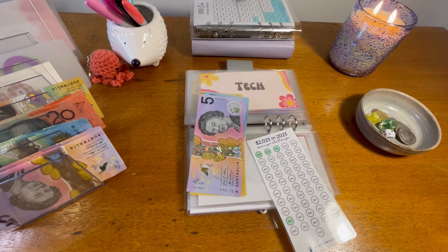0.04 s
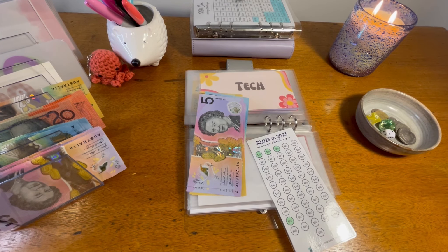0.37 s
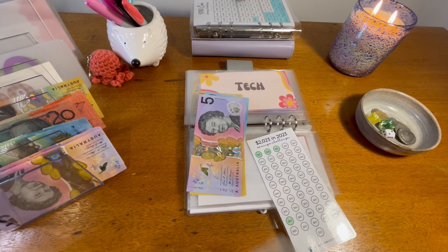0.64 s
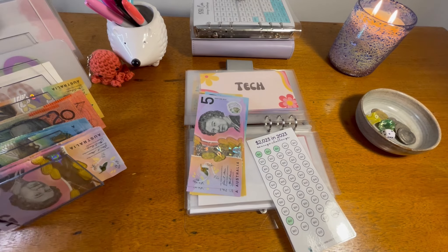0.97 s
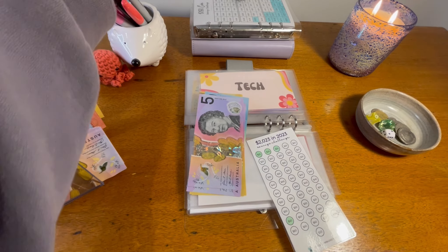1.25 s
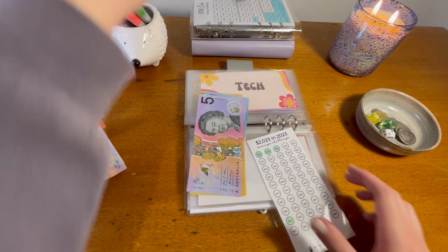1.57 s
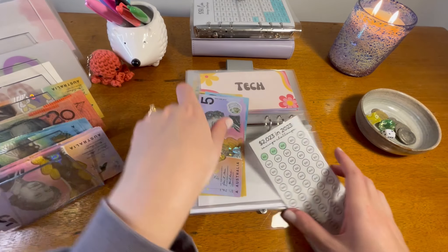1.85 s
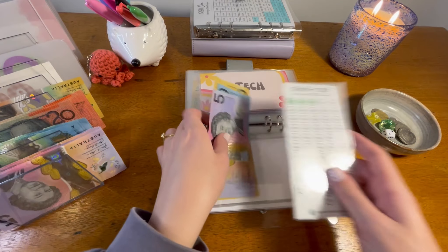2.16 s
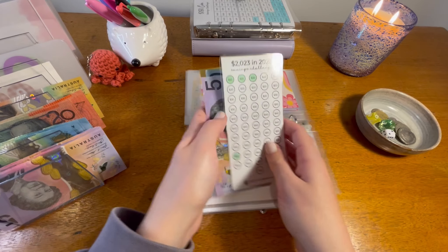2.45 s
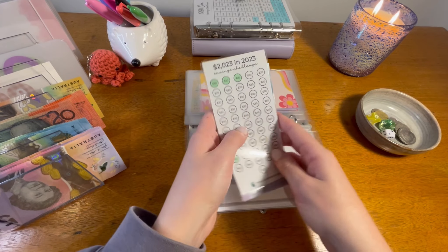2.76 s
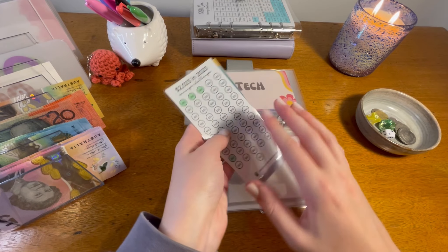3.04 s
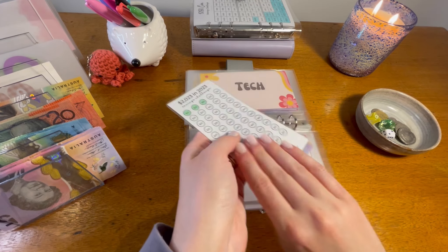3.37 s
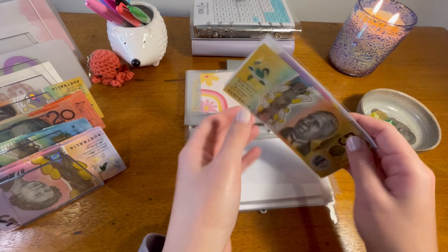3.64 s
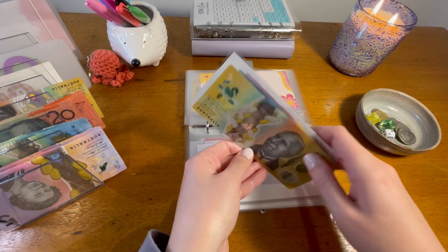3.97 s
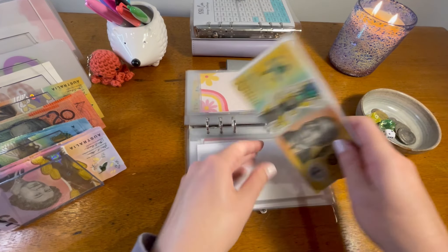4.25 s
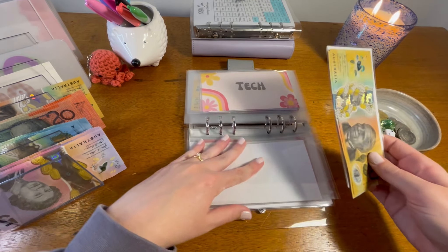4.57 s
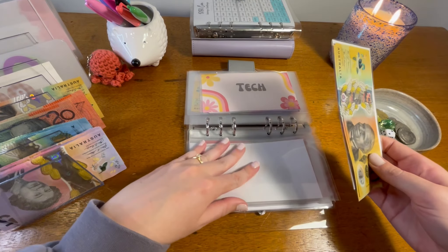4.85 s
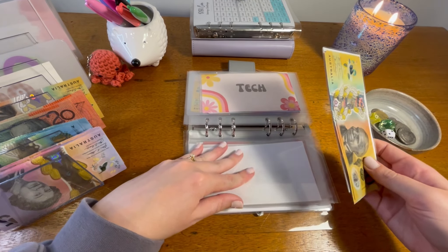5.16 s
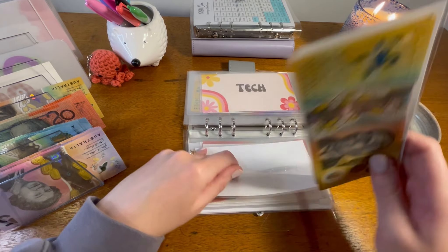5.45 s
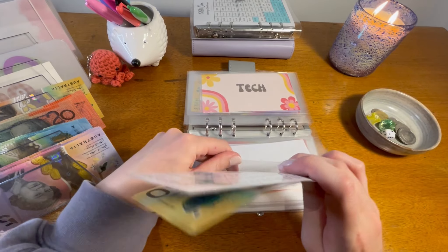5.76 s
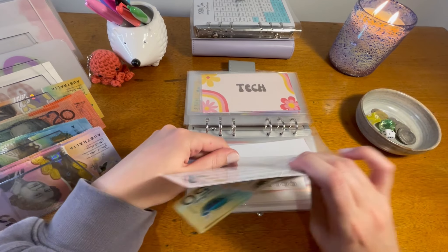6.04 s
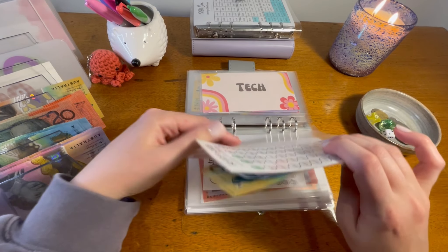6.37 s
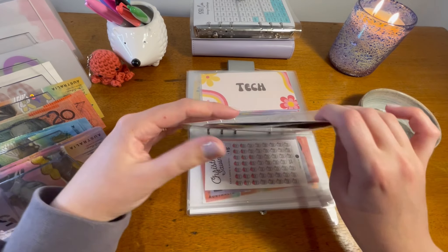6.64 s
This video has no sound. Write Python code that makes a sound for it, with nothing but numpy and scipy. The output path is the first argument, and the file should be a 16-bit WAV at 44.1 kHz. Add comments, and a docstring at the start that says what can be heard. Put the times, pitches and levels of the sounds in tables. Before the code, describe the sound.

A wooden desk thumps and creaks briefly at about 0.2 seconds, followed by a few soft bumps and small crisp snaps. From 1.2 to 1.8 seconds a chair clunks repeatedly and rolls with a low rumble, its spring twanging. Around 2 seconds a card and banknotes tap and slap down, with hollow pats that make the desk top boom softly. They slide together in short hissing strokes until 3 seconds, then more sparsely. A sharp snap comes at 4.3 seconds, followed by light pats and ticks, and a steel binder ring pings faintly near 4.9. More snaps and a brief rustle follow between 5.1 and 5.4. From 6 seconds to about 6.8, stiff plastic sleeves are turned, rubbing and crackling, loudest near 6.4, where they land with hollow pats. Everything sounds close in a small room, over a faint rumble and hiss.

```python
"""A wooden desk thumps and creaks as someone leans on it; then a chair clunks and rolls closer, twanging.
A card and banknotes are slid together and flicked, and a binder's plastic sleeves are turned: stiff
sheets snap as they buckle, hiss as they rub and land with hollow pats that set the desk top booming.
A binder ring pings once. It all plays in a small room, over a faint rumble and hiss."""
import sys
import numpy as np
from scipy import signal
from scipy.fft import rfft, irfft, next_fast_len
from scipy.io import wavfile
from scipy.ndimage import uniform_filter1d, map_coordinates

SR = 44100
rng = np.random.default_rng(int(sys.argv[2]) if len(sys.argv) > 2 else 0)


def wav_record(signal):
    """Record a signal, one row per channel, as 16-bit PCM in the file named by sys.argv[1]."""
    frames = np.transpose(np.atleast_2d(signal))
    bounded = np.clip(frames, -1, 1)
    # unit amplitude maps onto the largest positive 16-bit level
    quanta = np.round(bounded * 32767).astype(np.int16)
    wavfile.write(sys.argv[1], SR, quanta)


N = 299858
TIME = np.arange(N) / SR
HIT_TIME = np.arange(SR // 2) / SR  # the half second given to each one-shot
SIDES = np.array([[.5], [-.5]])  # splits a difference between left and right
TOP_HZ = 15900

# a stiff sheet buckling: t/s, level/dB, centre f/Hz
BUCKLES = [(0.324,-44.5,13000), (0.806,-35,5370), (0.806,-36,8270), (0.979,-37.5,4470), (1.52,-40,9000),
           (4.3134,-31,8360), (4.3163,-29.5,7300), (4.3157,-38,3350), (4.3206,-50,2030), (4.927,-45.5,9900),
           (5.1122,-32,11300), (5.3027,-43,4700), (5.3341,-35,3730), (6.374,-31,5430)]
# a card's edge tapping the stack: t/s, level/dB
CARD_TAPS = [(1.7703,-44), (1.779,-39.5), (1.8027,-45), (1.9745,-29.5), (2.027,-28), (2.16,-34.5),
             (2.327,-42.5), (2.344,-51), (2.393,-45), (2.507,-44.5), (2.68,-48), (2.695,-48.5),
             (2.892,-44.5), (3.5,-46.5), (6.739,-44)]
# the card's hollow resonances: f/Hz
CARD_MODES = [1070, 1350, 1622, 2054]
# a sheet slapping down flat: t/s, level/dB
SHEET_SLAPS = [(1.882,-31.5), (2.028,-31), (2.147,-37.5), (4.133,-46), (4.4502,-37.5), (4.466,-38.5),
               (6.379,-35.5), (6.546,-41)]
# a crease giving way: t/s, level/dB
CREASE_TICKS = [(2.341,-40.5), (2.504,-35.5), (2.548,-43), (3.553,-45), (4.515,-42.5), (4.561,-45),
                (5.321,-40), (5.7698,-40), (6.25,-50), (6.304,-51), (6.412,-33)]
# the crack of a stiff sheet: f/Hz, level/dB
SHEET_EQ = [(150, -42), (500, 2), (820, 6), (1300, 6), (2000, 6), (3200, 2.5), (7500, 4), (12000, -6.5),
            (15500, -17.5)]
# strokes of sheet on sheet: t/s, swell/s, time to release/s, level/dB
SLIDE_STROKES = [(0,0.0022,0.11,-62), (0.509,0.042,0.15,-70.5), (1.99,0.024,0.045,-52),
                 (2.278,0.033,0.075,-54.5), (2.38,0.023,0.084,-58), (2.495,0.0076,0.08,-52.5),
                 (2.623,0.019,0.065,-58.5), (2.861,0.017,0.068,-54.5), (3.381,0.019,0.074,-60.5),
                 (3.491,0.0088,0.062,-58.5), (3.878,0.011,0.02,-52.5), (3.941,0.015,0.057,-58),
                 (4.577,0.037,0.11,-59), (5.295,0.013,0.04,-56.5), (5.673,0.01,0.13,-65.5),
                 (5.996,0.025,0.068,-55.5), (6.066,0.079,0.083,-50), (6.357,0.022,0.02,-42.5),
                 (6.417,0.028,0.031,-46.5)]
# sheets shifting in the hands: t/s, hiss level/dB, flex level/dB
HANDLING_FADERS = [(1.72, -58, -57), (2.34, -56.5, -54.5), (2.55, -64.5, -59.5), (2.72, -58.5, -75),
                   (3.05, -85, -83), (3.37, -86, -88), (3.52, -61, -64), (3.85, -114, -91),
                   (4.09, -67.5, -89), (4.25, -69, -74.5), (4.55, -65, -59), (4.68, -78, -71),
                   (5.0, -103, -68.5), (5.28, -95, -89.5), (5.36, -51, -58.5), (5.56, -81, -101.5),
                   (5.93, -93, -98), (6.0, -55.5, -61.5), (6.2, -58.5, -61), (6.8, -61.5, -59)]
# sheets sliding: f/Hz, level/dB
SLIDE_EQ = [(880, -16), (1500, -15), (1850, -19), (2040, -9), (3570, -11.5), (4630, -10), (11300, -10.5),
            (15000, -24.5)]
# sheets flexing: f/Hz, level/dB
FLEX_EQ = [(60, 5.5), (130, 12.5), (400, -1.5), (640, 3), (900, -3.5), (1300, -1), (2200, -1),
           (3400, -38.5)]
# hands and sleeves landing: t/s, pat level/dB, pat f/Hz, desk boom level/dB
TOUCHDOWNS = [(0.175,-44.5,410,-39), (0.237,-37.5,214,-26.5), (0.318,-56,236,-44), (0.544,-47.5,328,-43.5),
              (0.57,-47,297,-40), (1.883,-47,726,-44.5), (1.972,-42.5,650,-50), (2.027,-39,370,-44),
              (2.148,-34,418,-41), (2.16,-31.5,344,-34), (2.331,-50,340,-44.5), (2.694,-52,380,-51),
              (2.902,-82,250,-55), (3.499,-42,634,-45), (3.824,-74,231,-48.5), (4.133,-54.5,246,-50.5),
              (4.204,-46,213,-48), (4.392,-52.5,466,-55.5), (4.451,-37.5,495,-75), (4.859,-48,415,-58.5),
              (5.112,-48,375,-48.5), (5.35,-44.5,636,-51), (6.376,-32.5,612,-44.5), (6.451,-39,262,-44.5),
              (6.463,-43.5,610,-67), (6.548,-42,570,-62)]
# the desk top's modes: f/Hz, level/dB, t60/s
DESK_MODES = [(95.3, -7.5, 0.17), (134, -3.5, 0.24), (212.4, 6, 0.13), (259.7, -3.5, 0.15),
              (325, -10.5, 0.15)]
# slips of one desk joint as weight comes on: t/s
CREAK_SLIPS = [0.2225, 0.236, 0.2445, 0.264]
# the wood of that joint: f/Hz, level/dB
WOOD_EQ = [(500, -14), (860, 14), (1300, -0.5), (2100, 6.5), (2600, -2), (3800, 0.5), (5200, -5),
           (11000, -9), (15000, -34)]
# chair joints giving way: t/s, frame level/dB, crack over frame/dB, spring over frame/dB
CHAIR_CLUNKS = [(1.1663, -32.5, 11.5, -9.5), (1.259, -37.5, 3.5, 2.5), (1.321, -32.5, 2, -10),
                (1.378, -35.5, -7, -11.5), (1.412, -30, -29, -20), (1.497, -30.5, -22.5, -22),
                (1.571, -27.5, -6.5, -12), (1.612, -30, 1, -7), (1.622, -30.5, -2.5, 2)]
# the crack of a chair joint: f/Hz, level/dB
CRACK_EQ = [(590, -8), (1000, -12.5), (1900, -18), (3200, -12), (3900, -6), (6700, -7.5), (8500, -13),
            (10500, -16.5), (12200, -10.5), (15500, -26)]
# the chair frame's modes: f/Hz, level/dB, t60/s
FRAME_MODES = [(135.7, 1.5, 0.4), (186, 3, 0.12), (258.8, 1.5, 0.24), (342.7, 2, 0.12), (448, 0.5, 0.059),
               (608, 5.5, 0.047), (748, -0.5, 0.084), (784, 6.5, 0.039)]
# the rattling spring's modes: f/Hz, level/dB, t60/s
SPRING_MODES = [(2273, 9, 0.015), (2370, -1, 0.033)]
# the chair rolling over the floor: t/s, level/dB
ROLL_FADER = [(1.18, -53.5), (1.3, -51), (1.41, -52.5), (1.465, -54.5), (1.64, -44), (1.72, -55),
              (1.85, -64)]
# the rumble of that roll: f/Hz, level/dB
ROLL_EQ = [(60, -2), (130, -4), (270, -7), (420, -8), (750, -11), (1100, -20.5), (2000, -30)]
# the spring ringing free: t/s, level/dB, f/Hz
SPRING_TWANGS = [(1.271, -55, 2370), (1.617, -40, 2273)]
# a steel binder ring's modes: f/Hz, level/dB, t60/s
STEEL_MODES = [(8740, 4, 0.12), (8500, -1, 0.1)]
# room tone: f/Hz, level/dB
ROOM_TONE_EQ = [(28, -16), (46, 8), (90, -5), (140, -11), (250, -13), (450, -21.5), (1000, -22.5),
                (2000, -28), (4000, -29.5), (7000, -26), (8500, -20), (10000, -28), (13000, -32.5)]
# pauses in which the room's hiss sinks: t/s
HISS_DIPS = [0.47, 3.19, 3.8, 5.04, 5.24, 5.9]
# the room's decay: f/Hz, t60/s
REVERB_DECAY = [(120, 0.64), (300, 0.21), (1000, 0.34), (4000, 0.31), (8500, 0.3), (11000, 0.1),
                (14000, 0.047)]
# the walls' reflection: f/Hz, level/dB
REVERB_EQ = [(100, -9), (400, -2.5), (1500, -3), (7000, -3), (10000, -3.5), (14000, -21.5)]
# balance of the two microphone ports: f/Hz, left minus right level/dB
PORT_BALANCE = [(50, 5), (250, 4.5), (1200, 3.5), (2500, 3), (5000, 4.5), (8500, -4.5), (12000, -0.5)]


def sheet_snaps():
    """Stiff sheets buckle brightly, tap with an edge, slap down flat or tick at a crease."""
    buckles = clicks([(s, db, fold_colour(hz)) for s, db, hz in BUCKLES], t60=0.019, wet_db=-6.5)
    taps = clicks([(s, db, card_colour) for s, db in CARD_TAPS], t60=0.035, wet_db=-9.5)
    slaps = clicks([(s, db, eq(SHEET_EQ)) for s, db in SHEET_SLAPS], t60=0.025, wet_db=-5, edge=0)
    ticks = clicks([(s, db, eq(SHEET_EQ)) for s, db in CREASE_TICKS], t60=0.017, wet_db=-17.5)
    return buckles + taps + slaps + ticks


def fold_colour(hz):
    """A fold resonates over the sheet's crack; the smaller the fold, the higher."""
    return lambda f: eq(SHEET_EQ)(f) * hump(f, hz, octaves=0.4, skirt_db=-20)


def card_colour(f):
    """The card's narrow, hollow resonances stand over the sheet's crack."""
    return eq(SHEET_EQ)(f) * sum(hump(f, hz, octaves=0.093, skirt_db=-21) for hz in CARD_MODES)


def sheet_slides():
    """Strokes swell, hold and die over the handling: sheets hiss as they slide and rustle as they flex."""
    strokes = np.zeros(N)
    for s, rise, hold, db in SLIDE_STROKES:
        swell = np.sin(np.pi / 2 * np.clip(HIT_TIME / rise, 0, 1)) ** 2
        release = np.exp(-np.maximum(HIT_TIME - hold, 0) / 0.017)
        add(strokes, s, amp(db) * swell * release)
    hiss_db, flex_db = curves(HANDLING_FADERS)
    hiss_gain = np.hypot(amp(hiss_db - 3), strokes)
    flex_gain = np.hypot(amp(flex_db - 3.5), amp(-6) * strokes)
    grip = amp(0.9 * wobble(60))  # the sheets catch and let go
    hiss = hiss_gain * friction(SLIDE_EQ, grain_db=2.5, grain_rate=700, patchy_db=2.5, alike=0.05)
    flex = flex_gain * friction(FLEX_EQ, grain_db=4.3, grain_rate=260, patchy_db=4.5, alike=0.57)
    return in_room(grip * (hiss + flex), wet_db=-7)[:, :N]


def friction(spectrum, grain_db, grain_rate, patchy_db, alike):
    """Tiny slips of uneven size; the sheet's colour shifts in patches as it bends."""
    slips = stereo_noise(N, alike) * amp(grain_db * wobble(grain_rate))
    bands = signal.stft(slips, nperseg=512)[2]
    bending = uniform_filter1d(rng.standard_normal(bands.shape[1:]), size=7, axis=0)
    bending = uniform_filter1d(bending, size=5, axis=1)
    slips = signal.istft(bands * amp(patchy_db * unit(bending)), nperseg=512)[1][:, :N]
    return unit(filtered(slips, eq(spectrum)))


def sleeve_pats():
    """The stack of sleeves is well damped: each landing is a short hollow note and a puff of air."""
    out = np.zeros((2, N))
    t60 = 0.053
    for s, db, hz, _ in TOUCHDOWNS:
        hollow = lambda f: hump(f, hz, octaves=0.65, skirt_db=-19) / (1 + (f / (5 * hz)) ** 2)
        puff = burst(t60, hollow, rise=0.00055, alike=0.3, edge=0)
        note = ring([(hz, 0, t60)], TOP_HZ, rise=0.001, scatter_db=0, spread=0.5)
        pat = amp(-4.5) * note + amp(-0.5) * puff
        add(out, s, in_room(amp(db) * pat, wet_db=-3.5))
    return out


def desk_booms():
    """Each landing sets the desk top booming, the gentle ones only in its lowest modes."""
    out = np.zeros((2, N))
    lag_s = 0.0024  # the desk gives way just after the contact
    for s, _, _, db in TOUCHDOWNS:
        contact_hz = 188 * 2 ** ((db + 30) / 9.5)  # an octave brighter per 9.5 dB
        boom = ring(DESK_MODES, contact_hz, rise=0.0095, scatter_db=5.5, spread=0.15)
        add(out, s + lag_s, in_room(amp(db) * boom, wet_db=-7.5))
    return out


def desk_creak():
    """A desk joint slips in dry steps, each harder as the load grows."""
    first_db, growth_db_per_s = -31.5, 100
    slips = [(s, first_db + growth_db_per_s * (s - CREAK_SLIPS[0]), eq(WOOD_EQ)) for s in CREAK_SLIPS]
    return clicks(slips, t60=0.011, wet_db=-7, edge=0.9)


def chair():
    """Each joint cracks, knocks the frame and rattles a spring while the chair rumbles over the floor."""
    out = np.zeros((2, N))
    for s, db, crack_db, spring_db in CHAIR_CLUNKS:
        joint = rippled(eq(CRACK_EQ), depth_db=1.2, spacing_hz=120)
        crack = burst(0.027, joint, rise=0.00054, alike=0.12, edge=0.23)
        contact_hz = 1500 * 2 ** (crack_db / 14)  # a blow with little crack is a soft one
        frame = ring(FRAME_MODES, contact_hz, rise=0.00089, scatter_db=2, spread=0.5)
        rattle = amp(2.5 * wobble(300)[:len(HIT_TIME)])
        spring = rattle * ring(SPRING_MODES, cut_hz=5000, rise=0.001, scatter_db=2, spread=0.46)
        add(out, s, amp(db + crack_db) * in_room(crack, wet_db=0))
        add(out, s, in_room(amp(db) * (frame + amp(spring_db) * spring), wet_db=1.5))
    roll_db, = curves(ROLL_FADER)
    judder = amp(3 * wobble(70))
    rumble = unit(filtered(stereo_noise(N, alike=0.22) * judder, eq(ROLL_EQ)))
    return (out + amp(roll_db) * rumble) * amp(-0.5 * SIDES)  # panned a touch right


def spring_twangs():
    """The chair's spring comes free and rings on, its level wavering."""
    out = np.zeros((2, N))
    t60 = 0.34
    for s, db, hz in SPRING_TWANGS:
        waver = amp(2 * wobble(90)[:len(HIT_TIME)])
        tone = ring([(hz, 0, t60)], TOP_HZ, rise=0.004, scatter_db=0, spread=0.4)
        add(out, s, amp(db) * waver * tone)
    return out


def binder_ping():
    """A steel binder ring is brushed and sings faintly."""
    out = np.zeros((2, N))
    steel = ring(STEEL_MODES, TOP_HZ, rise=0.0005, scatter_db=1, spread=0.5)
    add(out, 4.927, amp(-56.5) * steel)
    return out


def room_tone():
    """The bed: a steady, centred rumble under a thin, wide hiss that dips in the pauses."""
    colour = eq(ROOM_TONE_EQ)
    lows = lambda f: 1 / (1 + (f / 250) ** 2)
    rumble = filtered(stereo_noise(N, alike=0.9), lambda f: colour(f) * lows(f))
    hiss = filtered(stereo_noise(N, alike=0.087), lambda f: colour(f) * (1 - lows(f)))
    dips = sum(np.exp(-((TIME - s) / 0.1) ** 2) for s in HISS_DIPS)
    return amp(-65.5) * unit(rumble + amp(-6 * dips) * hiss)


def in_room(x, wet_db, build_s=0.0066, diffuse_hz=443):
    """A sound plus a small-room tail, different at each spot and near mono below diffuse_hz."""
    hz, t, bands = signal.stft(rng.standard_normal((2, len(HIT_TIME))), SR, nperseg=256)
    bands = correlate(*bands, alike=1 / (1 + (hz[:, None] / diffuse_hz) ** 2))
    decay = 1e-3 ** (t / along(REVERB_DECAY, hz)[:, None])
    tail = signal.istft(bands * decay, SR, nperseg=256)[1][:, :len(HIT_TIME)]
    tail *= 1 - np.exp(-(HIT_TIME / build_s) ** 2)
    tail = coloured(tail / np.linalg.norm(tail[0]), eq(REVERB_EQ))
    direct = np.pad(x, ((0, 0), (0, len(HIT_TIME) - 1)))
    return direct + amp(wet_db) * signal.fftconvolve(x, tail, axes=1)


def clicks(rows, t60, wet_db, edge=0.56):
    """Something stiff lets go in a few milliseconds; rows are t/s, level/dB, colour."""
    out = np.zeros((2, N))
    for s, db, colour in rows:
        resonances = rippled(colour, depth_db=1.5, spacing_hz=330)
        snap = burst(t60, resonances, rise=0.00041, alike=0.21, edge=edge)
        add(out, s, in_room(amp(db) * snap, wet_db))
    return out


def burst(t60, colour, rise, alike, edge):
    """A one-sample edge and a dying puff of noise, both through the same colour."""
    envelope = 1e-3 ** (HIT_TIME / t60) * (1 - np.exp(-HIT_TIME / rise))
    puff = envelope * stereo_noise(len(HIT_TIME), alike)
    puff[:, 0] = edge * np.linalg.norm(envelope)
    return unit(coloured(puff, colour)) * np.sqrt(np.mean(envelope ** 2))


def ring(modes, cut_hz, rise, scatter_db, spread):
    """Modes struck at fresh strengths, peak 1; a soft contact misses those above cut_hz."""
    hz, db, t60 = np.transpose(modes)[:, :, None]
    strength = amp(db + scatter_db * rng.standard_normal(hz.shape)) / np.sqrt(1 + (hz / cut_hz) ** 4)
    phase = rng.uniform(0, 2 * np.pi, hz.shape) + spread * rng.standard_normal((2, len(hz), 1))
    partials = strength * 1e-3 ** (HIT_TIME / t60) * np.sin(2 * np.pi * hz * HIT_TIME + phase)
    tone = partials.sum(axis=1) * (1 - np.exp(-HIT_TIME / rise))
    return tone / np.abs(tone).max()


def rippled(colour, depth_db, spacing_hz):
    """A colour with the crowded resonances of one fold or joint, as random peaks and dips."""
    knots = rng.standard_normal(SR // 100)
    return lambda f: colour(f) * amp(depth_db * map_coordinates(knots, [f / spacing_hz], mode="nearest"))


def hump(hz, centre_hz, octaves, skirt_db):
    """A resonant bell standing on a flat skirt."""
    return np.exp(-.5 * (np.log2((hz + 1) / centre_hz) / octaves) ** 2) + amp(skirt_db)


def eq(points):
    """A colour (gain over frequency) drawn through f/Hz, level/dB points."""
    return lambda f: amp(along(points, f))


def along(points, hz):
    """Read f/Hz, value points on a log frequency axis."""
    f, value = np.transpose(points)
    return np.interp(np.log(hz + 1), np.log(f + 1), value)


def filtered(x, gain):
    """A whole track through a gain that depends on frequency."""
    size = next_fast_len(N + SR // 2)
    return irfft(rfft(x, size) * gain(np.fft.rfftfreq(size, 1 / SR)), size)[..., :N]


def coloured(x, gain):
    """A one-shot through a minimum-phase filter, so that its attack stays sharp."""
    size = 2 * len(HIT_TIME)
    magnitude = np.maximum(gain(np.fft.rfftfreq(size, 1 / SR)), 1e-6)
    cepstrum = irfft(np.log(magnitude))
    cepstrum[1:size // 2] *= 2
    cepstrum[size // 2 + 1:] = 0
    return irfft(rfft(x, size) * np.exp(rfft(cepstrum)))[..., :len(HIT_TIME)]


def curves(rows):
    """Fader moves in dB, one for each column after the time, silent outside."""
    s, *faders = np.transpose(rows)
    return [np.interp(TIME, s, db, left=-120, right=-120) for db in faders]


def wobble(rate):
    """A smooth random curve, rate knots a second."""
    return map_coordinates(rng.standard_normal(int(N * rate / SR) + 4), [TIME * rate])


def stereo_noise(size, alike):
    """White noise, from wide (alike 0) to mono (alike 1)."""
    return correlate(*rng.standard_normal((2, size)), alike)


def correlate(mid, side, alike):
    """Blend two independent noises into a left and right whose correlation is alike."""
    angle = np.arccos(alike) / 2
    return np.cos(angle) * mid + np.sin(angle) * np.array([side, -side])


def add(track, s, sound):
    """Mix a sound into the track at time s."""
    start = round(s * SR)
    part = track[..., start:start + sound.shape[-1]]
    part += sound[..., :part.shape[-1]]


def amp(db):
    """Decibels to gain."""
    return 10 ** (np.asarray(db) / 20)


def unit(x):
    """Scale to rms 1."""
    return x / np.sqrt(np.mean(x ** 2) + 1e-20)


def scene():
    """The mix: sheets, binder and furniture over the room tone."""
    hits = desk_creak() + sheet_snaps() + binder_ping() + sleeve_pats() + desk_booms()
    return hits + chair() + spring_twangs() + sheet_slides() + room_tone()


def record(dry):
    """Two microphone ports favour different bands, the left slightly early; lows and highs are cut."""
    lead_s, low_cut_hz, high_cut_hz = 0.00008, 35, 13800
    ports = lambda f: amp(SIDES * along(PORT_BALANCE, f)) * np.exp(2j * np.pi * f * lead_s * SIDES)
    low_cut = lambda f: 1 - 1 / (1 + (f / low_cut_hz) ** 4)
    high_cut = lambda f: (f < TOP_HZ) / (1 + (f / high_cut_hz) ** 20)
    return filtered(dry, lambda f: ports(f) * low_cut(f) * high_cut(f))


dry = scene()
out = record(dry)
wav_record(out)
```